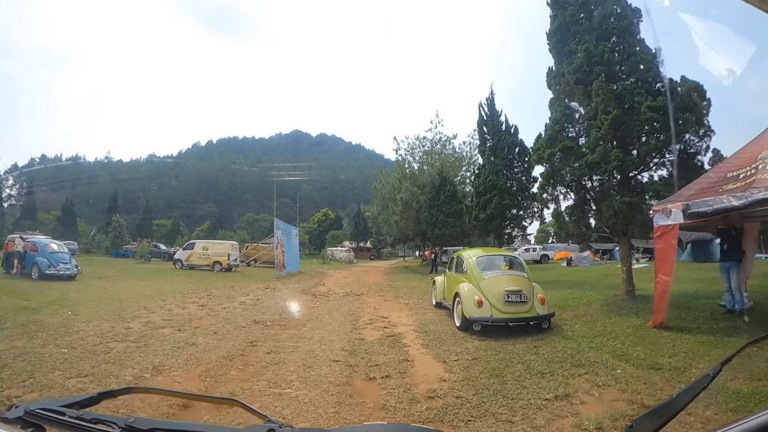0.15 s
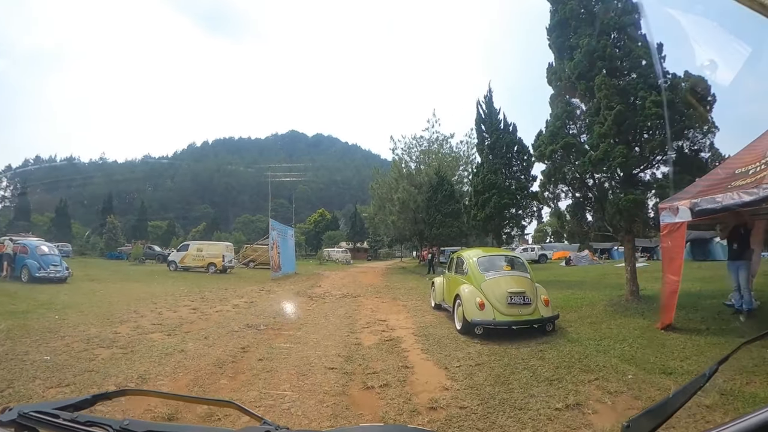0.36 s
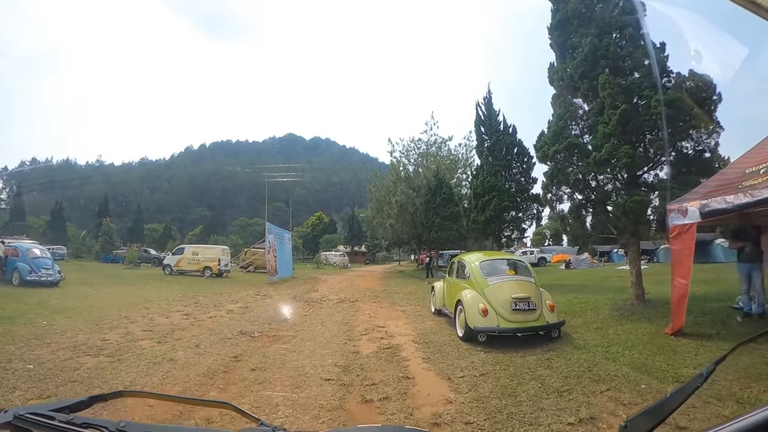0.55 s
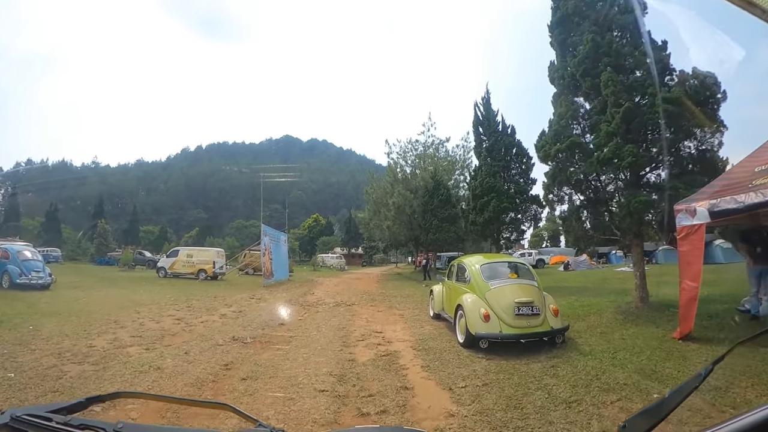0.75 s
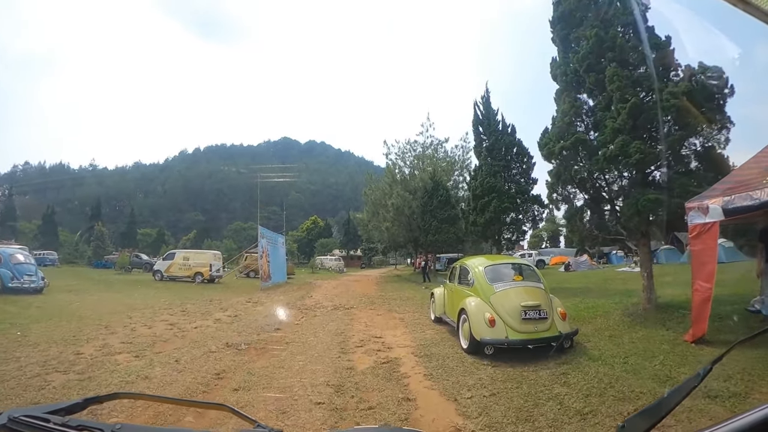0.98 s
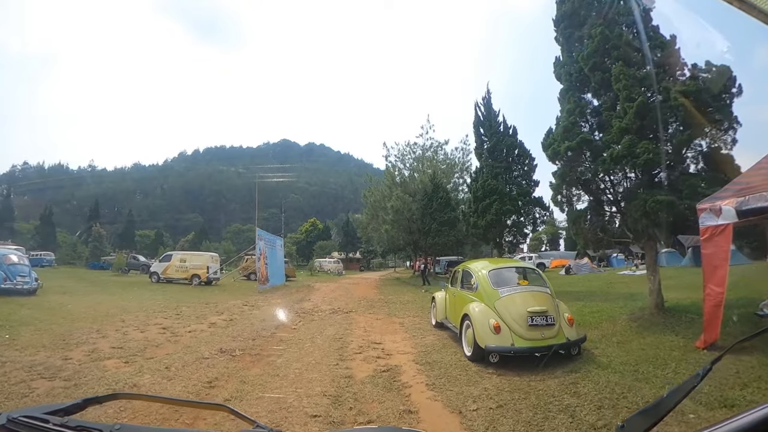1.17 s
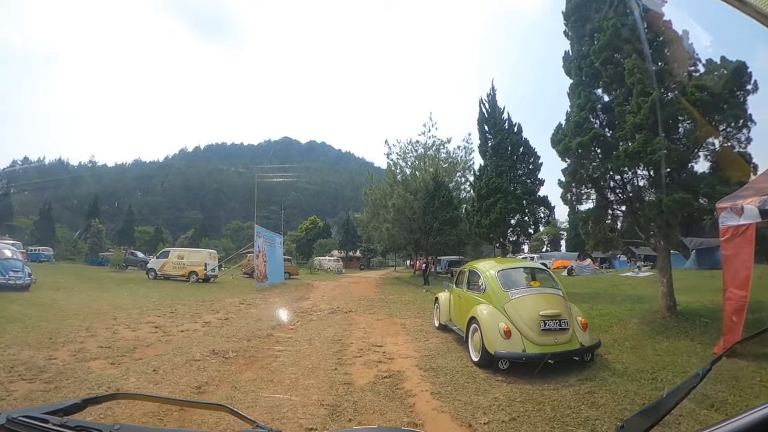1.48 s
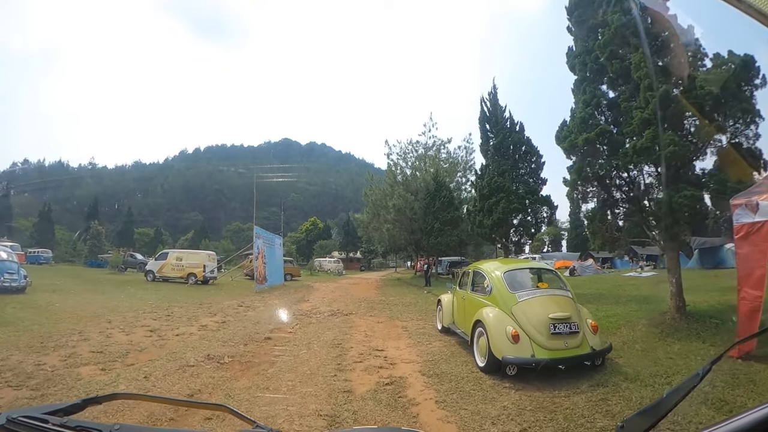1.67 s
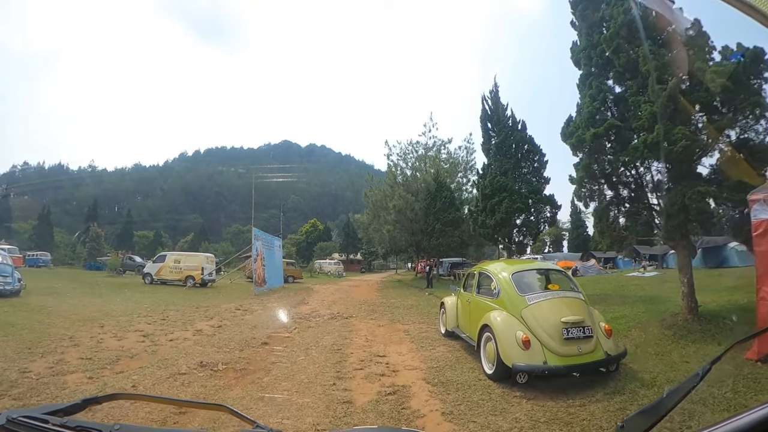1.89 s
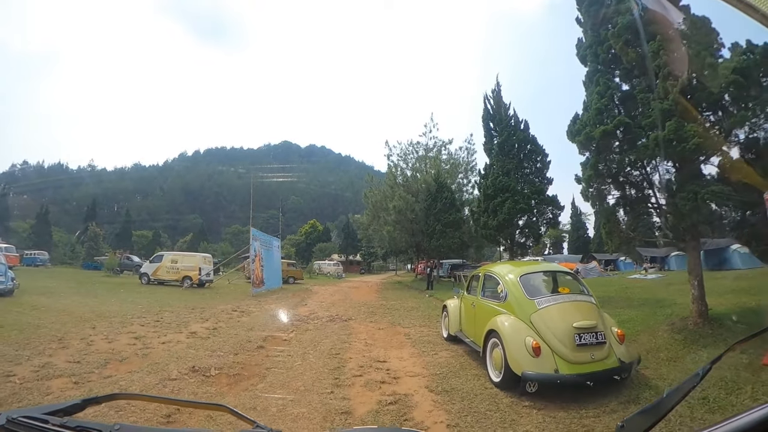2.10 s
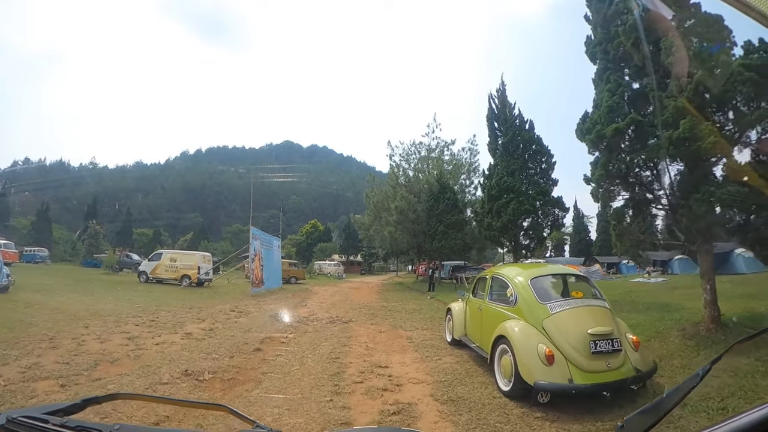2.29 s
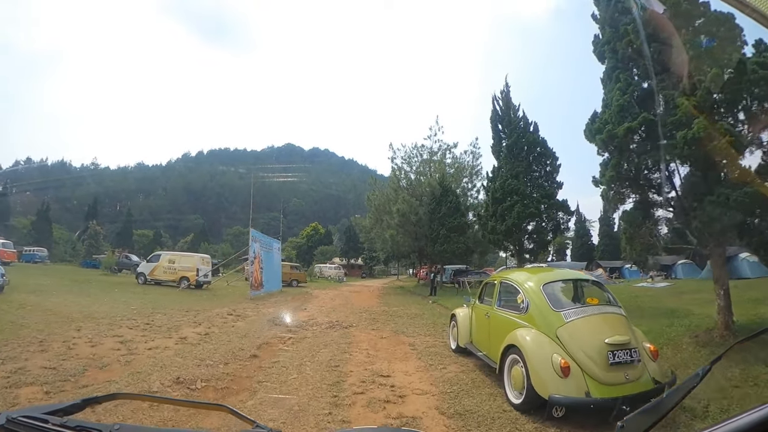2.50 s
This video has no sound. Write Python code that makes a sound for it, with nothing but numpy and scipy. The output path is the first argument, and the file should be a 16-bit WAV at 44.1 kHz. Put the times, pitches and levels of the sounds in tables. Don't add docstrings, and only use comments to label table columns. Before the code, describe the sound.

An old air-cooled engine booms low inside a van cab crawling over rough dirt; keys jingle early, loose trim knocks sharply in the first second, then only small ticks, faint panel rings and grit under tyres.

```python
import sys
import numpy as np
from scipy import signal
from scipy.fft import rfft, irfft, next_fast_len
from scipy.io import wavfile
from scipy.ndimage import uniform_filter1d, minimum_filter1d, map_coordinates

SR = 44100
rng = np.random.default_rng(int(sys.argv[2]) if len(sys.argv) > 2 else 0)


def undo_db(level):
    steps = np.asarray(level, float) / 20
    return 10 ** steps


def store_pcm(level_fs):
    pcm = np.round(np.clip(level_fs, -1, 1) * 32767).astype(np.int16)
    wavfile.write(sys.argv[1], SR, np.atleast_2d(pcm).T)


N = 116865
T = np.arange(N) / SR

# frequency in Hz, t60 in seconds.
CAB_DECAY = [(500, 0.058), (3000, 0.096), (10000, 0.15)]
# time in seconds, level in dB.
SQUEAL_LEVEL = [
    (.14, -82),
    (.195, -72),
    (.21, -53),
    (.27, -56.5),
    (.3, -68),
    (.35, -58),
    (0.367, -84),
]
# frequency in Hz, level in dB.
SQUEAL_LINES = [(11915, 1), (12104, -7.5)]
# start in seconds, level in dB, share of the second key from 0 to 1.
JINGLES = [
    (.008, -56.5, 0.87),
    (0.356, -41, 0.016),
    (0.374, -42.5, 0.66),
    (0.403, -57.5, 0.38),
    (0.578, -52.5, 0.55),
]
# frequency in Hz, first key's level in dB, second key's level in dB,
# t60 in seconds.
KEY_MODES = [(6150, 6, -24, .09), (8420, -10.5, 11, .11), (9450, -8, -14, .2), (9570, 4, -13.5, .11),
             (10660, -4, -3.5, .08), (11520, -7, -6.5, .1), (12450, -15, -12, .12), (13380, -15, -8, .07),
             (14520, -15, -21, .2), (15050, -22, -25, .1)]
# start in seconds, level in dB, pitch in Hz, brightness in dB,
# crack level in dB.
KNOCKS = [(0.4386, -34, 1810, -20, 0), (0.3999, -26, 2960, -8, -3), (0.4635, -27, 1900, -22, -4),
          (.4743, -22, 1600, -20, -14), (0.485, -28.5, 4500, 11, 0), (0.5575, -15.5, 3000, 0, -5.5),
          (0.6962, -31.5, 1900, 0, -8), (0.7289, -31, 1820, 3, -2), (0.779, -23, 2410, -28.5, -9),
          (0.8068, -19.5, 2150, 1.5, -5.5), (0.822, -25, 2800, -22, -9), (0.8749, -21, 3400, 8.5, -8)]
# frequency in Hz, level in dB, t60 in seconds.
TRIM_MODES = [(1070, -3, 0.047), (1403, -1, .05), (1838, 7.5, 0.027), (2260, -12, 0.08), (2560, -5, 0.061),
              (2680, 2, 0.034), (2940, 5, 0.031), (3225, 1.5, 0.038), (3220, -6.5, 0.065),
              (3740, -0.5, 0.042), (4100, -13, 0.034), (4940, -10.5, 0.038), (5780, -25, 0.016),
              (7360, -18, .03)]
# start in seconds, level in dB.
TICKS = [(0.2744, -51), (1.4725, -44), (1.5393, -47.5), (1.6377, -48.5), (1.7044, -44), (1.8504, -50),
         (1.8641, -47), (1.921, -48), (2.0772, -51), (2.1184, -51), (2.1976, -48), (2.2824, -51)]
# centre in Hz, width in Hz, level in dB.
TICK_PEAKS = [(5880, 700, 1), (7150, 1500, -2.5), (3000, 1800, 0)]
# start in seconds, frequency in Hz, level in dB, t60 in seconds.
PANEL_NOTES = [(.02, 558, -39, .15), (.475, 895, -38.5, 0.2), (0.467, 1423, -36.5, 0.14),
               (.358, 1056, -39, 0.2), (.37, 1346, -47, 0.17), (.44, 554, -46.5, 0.18),
               (.559, 1150, -38.5, 0.043), (.465, 1826, -35, 0.097), (0.649, 1400, -40.5, 0.06),
               (0.661, 1110, -45, 0.068), (0.711, 1137, -42, 0.076), (.708, 1380, -48.5, .07),
               (.75, 1030, -47, 0.099), (.775, 563.7, -40.5, 0.14), (0.821, 1078, -38.5, 0.18),
               (.968, 1296, -47, .3), (0.984, 1078, -45.5, 0.2), (1.14, 1339, -44, 0.11),
               (1.145, 570, -43.5, 0.11), (1.15, 2210, -50, 0.17), (1.149, 2700, -48, 0.15),
               (1.19, 834, -45, 0.099), (1.205, 1110, -43, 0.091), (1.2, 3330, -53, .15),
               (1.24, 792, -43.5, 0.19), (1.26, 2096, -53, 0.058), (1.666, 1040, -35.5, .035),
               (1.703, 901.3, -40, 0.03), (1.704, 1710, -50.5, 0.035), (1.715, 2430, -58, .06),
               (1.851, 1772, -42.5, 0.063), (1.906, 1370, -38, 0.057), (1.906, 3000, -49.5, 0.025),
               (0.473, 218, -24, 0.066), (.885, 282, -35.5, 0.3), (1.84, 220, -38, 0.29),
               (2.2, 544, -39.5, 0.098), (2.26, 1020, -43, 0.25), (2.58, 2237, -49, 0.14)]
# start in seconds, length in seconds, level in dB, lean (small = sudden start).
CRUNCHES = [(0.028, 0.25, -47.5, 0.45), (0.351, 0.038, -42, .6), (0.465, 0.083, -39.5, 0.52),
            (0.646, 0.027, -60, 0.52), (1.083, 0.15, -48.5, 1), (1.162, 0.21, -58.5, 0.73),
            (1.699, 0.087, -46.5, 0.27), (1.847, 0.073, -45.5, 0.4), (1.918, 0.077, -51.5, 0.38),
            (2.068, 0.055, -52, 0.65), (2.537, 0.18, -51, 0.59)]
# frequency in Hz, density in dB per Hz.
GRIT_COLOUR = [(300, -32), (600, 0), (1100, 4), (1800, -6.5), (2800, -8), (4200, -14), (8200, -16),
               (13000, -43)]
# frequency in Hz, density in dB per Hz.
ROAD_COLOUR = [(4.7, -32.5), (8.0, -9), (37, -1), (61, -8), (83, -17.5), (108, -15.5), (218, -28.5),
               (351, -41.5), (400, -42), (520, -70.5), (880, -120)]
# start in seconds, length in seconds, peak in dB, pitch in Hz,
# glide in Hz per second.
BOOMS = [(.03, 0.23, -15, 52, 4.5), (.18, 0.31, -20.5, 48.7, -14), (.4, 0.19, -17, 48.9, 13.5),
         (.57, .12, -20.5, 54.9, 7.5), (.68, 0.316, -16.5, 54.07, 55.5), (.96, 0.38, -15.5, 53.08, 23),
         (1.31, 0.24, -14, 52.93, 6), (1.58, 0.4, -18, 52, 30), (1.93, 0.2, -17.5, 51.12, 24),
         (2.15, 0.44, -15, 52, 11.5), (2.48, 0.21, -19, 49.55, -14)]
# start in seconds, length in seconds, peak in dB, pitch in Hz.
HEAVES = [
    (-.03, 0.21, -23, 25.56),
    (0.259, 0.35, -21, 22.53),
    (0.841, 0.27, -24, 25.83),
    (1.002, 0.38, -18, 25.63),
    (1.44, 0.21, -18.5, 21.56),
    (1.639, 0.34, -22, 25.26),
    (1.98, 0.27, -17, 23.87),
    (2.249, 0.34, -22.5, 22.66),
    (2.548, 0.15, -21.5, 24.82),
]
# start in seconds, length in seconds, peak in dB, pitch in Hz.
PANEL_DRUMS = [
    (0, 0.17, -23.5, 73),
    (0.469, 0.26, -25.5, 69.85),
    (0.659, 0.32, -20.5, 72.09),
    (1.14, 0.2, -23.5, 74.05),
    (1.399, 0.11, -19.5, 70.49),
    (1.599, .12, -25, 70.57),
    (1.738, 0.347, -18.5, 66.13),
    (2.019, 0.18, -21.5, 73.12),
    (2.42, 0.16, -22.5, 67.1),
    (2.539, 0.12, -24, 70.88),
]
# start in seconds, length in seconds, peak in dB, pitch in Hz.
FLOOR_THUDS = [(0, 0.11, -33.5, 127.9), (0.461, 0.12, -34, 147.3), (.62, 0.13, -36.5, 149.7),
               (.75, 0.051, -37.5, 139.1), (0.84, 0.054, -40, 142.2), (1.001, .07, -44.5, 159.8),
               (1.169, .18, -43, 161), (1.501, 0.12, -39.5, 146.8), (1.63, .07, -34.5, 152.5),
               (1.81, 0.071, -40, 142.9), (2.01, 0.049, -38, 125), (2.1, 0.081, -35, 131.7),
               (2.18, 0.2, -37.5, 136.1), (2.549, 0.034, -43.5, 136.3)]
# multiple of the firing rate, level in dB.
SHAFT_ORDERS = [(1.5, -12.5), (2, -24)]
# frequency in Hz, density in dB per Hz.
RUSH_COLOUR = [(120, -49.5), (200, 5.5), (422, -7), (1100, -13), (1900, -21), (3300, -26.5), (4200, -29.5),
               (8300, -34), (9200, -45.5), (13000, -91.5)]
# time in seconds, rush level in dB.
RUSH_LEVEL = [(0, -48), (.2, -50.5), (.3, -54.5), (.6, -54), (.7, -49.5), (1.0, -52), (1.25, -49.5), (1.32, -55),
              (1.4, -52), (1.8, -51.5), (2.3, -51), (2.5, -53.5), (2.65, -53)]

FIRING_HZ, FIRING_DB, FIRING_WANDER = 52, -22.5, 0.019
KNOCK_RISE_S, KNOCK_SCATTER_DB, KNOCK_TILT_DB = 0.0012, 2, 14
KEY_RISE_S, KEY_SPLIT, KEY_SCATTER_DB = 0.006, 0.01, 1.5
IDLE_DB = -16.5
SURGE_RISE_HZ_PER_S, SURGE_LEAN = 7.14, 0.77
CAB_DB = -8
MIC_TOP_HZ, LIMIT_PEAK = 14200, 0.37
EDGE_S, EDGE_GAIN = 0.006, 0.6


def unit(x):
    return x / np.sqrt(np.mean(x ** 2) + 1e-20)


def along(points, hz):
    f, v = np.transpose(points)
    return np.interp(np.log(hz + 1), np.log(f + 1), v)


def wobble(rate):
    return map_coordinates(rng.standard_normal(200), [T * rate])


def since(start):
    return np.clip(T - start, 0, None)


def hump(start, length, lean):
    return np.sin(np.pi * np.clip((T - start) / length, 0, 1) ** lean)


def filtered(x, response):
    m = next_fast_len(len(x) + 8192)
    return irfft(rfft(x, m) * response(np.fft.rfftfreq(m, 1 / SR)), m)[:len(x)]


def peaks(rows):
    def response(f):
        total = 0
        for k, (centre, width, db) in enumerate(rows):
            damping = 1j * f * width
            total = total + (-1) ** k * undo_db(db) * damping / (centre ** 2 - f ** 2 + damping)
        return total
    return response


def noise(colour, patchy_db):
    z = signal.stft(rng.standard_normal(N + 512), nperseg=512)[2]
    field = uniform_filter1d(rng.standard_normal(z.shape), 6, axis=0)
    field = uniform_filter1d(field, 10, axis=1)
    x = signal.istft(z * undo_db(patchy_db * unit(field)), nperseg=512)[1][:N]
    return unit(filtered(x, lambda hz: undo_db(along(colour, hz))))


def ring(start, hz, db, t60, rise_s, turn=0):
    t = since(start)
    return undo_db(db - 60 * t / t60) * (1 - np.exp(-t / rise_s)) * np.sin(2 * np.pi * (hz * t + turn))


def cab(x):
    out, size = np.zeros(N + SR), SR // 10
    for start in range(0, N, size):
        hz, t, z = signal.stft(rng.standard_normal(SR // 5), SR, nperseg=128)
        decay = undo_db(-60 * t / along(CAB_DECAY, hz)[:, None])
        tail = signal.istft(z * decay, SR, nperseg=128)[1]
        wet = signal.fftconvolve(x[start:start + size], tail / np.linalg.norm(tail))
        out[start + 90:][:len(wet)] += wet
    return out[:N]


def squeal():
    s, db = np.transpose(SQUEAL_LEVEL)
    level = undo_db(np.interp(T, s, db, -200, -200))
    lines = np.zeros(N)
    for hz, line_db in SQUEAL_LINES:
        flutter = undo_db(line_db + 3.5 * wobble(45.6))
        lines += flutter * np.sin(2 * np.pi * np.cumsum(hz + 25 * wobble(50)) / SR)
    return level * lines


def keys():
    out, chatter = np.zeros(N), np.zeros(N)
    luck_db = rng.normal(0, KEY_SCATTER_DB, (len(JINGLES), len(KEY_MODES)))
    for (s, db, share), row in zip(JINGLES, luck_db):
        for (hz, first_db, second_db, t60), luck in zip(KEY_MODES, row):
            mode_db = db + first_db + np.clip(share, 0, 1) * (second_db - first_db) + luck
            for side in (-0.5, 0.5):
                out += ring(s, hz * (1 + side * KEY_SPLIT), mode_db - 5 - 4 * side, t60, KEY_RISE_S)
        chatter += np.clip((T - s) / 0.033, 0, 1) * undo_db(db + 3.5 - 60 * since(s) / 0.15)
    metal = peaks([(1200, 2500, 1), (7000, 5000, 0)])
    return out + filtered(chatter * rng.standard_normal(N), lambda f: metal(f) / (1 + 1j * f / 16000))


def trim_knocks():
    out = np.zeros(N)
    luck_db = rng.normal(0, KNOCK_SCATTER_DB, (len(KNOCKS), len(TRIM_MODES)))
    for (s, db, pitch, bright_db, crack_db), row in zip(KNOCKS, luck_db):
        for (hz, mode_db, t60), luck in zip(TRIM_MODES, row):
            tilt_db = KNOCK_TILT_DB * abs(np.log2(hz / pitch))
            out += ring(s, hz, db - 15 + mode_db + luck - tilt_db, t60, KNOCK_RISE_S, turn=luck)
        decay = undo_db(db + crack_db - 60 * since(s) / 0.059)
        crack = np.clip((T - s) / KNOCK_RISE_S, 0, 1) * decay * rng.standard_normal(N)
        shell = peaks([(pitch, 0.9 * pitch, 0), (7500, 4000, bright_db / 2 - 6)])
        out += filtered(crack, lambda f: shell(f) ** 2 / (1 + 1j * f / 11000) ** 2)
    return out


def trim_ticks():
    bursts = sum((T > s) * undo_db(db + 5 - 60 * since(s) / 0.013) for s, db in TICKS)
    return filtered(bursts * rng.standard_normal(N), lambda f: peaks(TICK_PEAKS)(f) ** 2)


def panel_notes():
    return sum(ring(s, hz, db, t60, 0.033 * t60) for s, hz, db, t60 in PANEL_NOTES)


def tyres():
    swell = sum(undo_db(db) * hump(s, length, lean) ** 2 for s, length, db, lean in CRUNCHES)
    grains = undo_db(2.4 * unit(uniform_filter1d(rng.standard_normal(N), SR // 400)))
    return swell * unit(grains * noise(GRIT_COLOUR, 1.5))


def mode(surges):
    mean_db, mean_hz = np.mean(surges, axis=0)[2:4]
    size = np.full(N, undo_db(mean_db + IDLE_DB))
    pull = size * mean_hz
    for s, length, db, hz, *glide in surges:
        swell = undo_db(db) * hump(s, length, SURGE_LEAN) ** 1.254
        rise = glide[0] if glide else SURGE_RISE_HZ_PER_S * hz / FIRING_HZ
        size = size + swell
        pull = pull + swell * (hz + rise * (T - s - length / 2))
    turns = np.cumsum(pull / size) / SR + rng.random()
    return size * np.sqrt(2) * np.sin(2 * np.pi * turns)


def body():
    rumble = undo_db(-25.5 + 0.62 * wobble(5)) * noise(ROAD_COLOUR, 3)
    return rumble + mode(BOOMS) + mode(HEAVES) + mode(PANEL_DRUMS) + mode(FLOOR_THUDS)


def engine():
    turns = np.cumsum(FIRING_HZ * (1 + FIRING_WANDER * wobble(5.5))) / SR
    shaft = np.zeros(N)
    for multiple, db in SHAFT_ORDERS:
        level = undo_db(FIRING_DB + db + 2.5 * wobble(7.3))
        shaft += level * np.sqrt(2) * np.sin(2 * np.pi * (multiple * turns + rng.random()))
    puffs = 1 + 0.08 * np.cos(2 * np.pi * turns)
    rush_db = np.interp(T, *np.transpose(RUSH_LEVEL))
    rush = undo_db(rush_db + 8 + 0.8 * wobble(15)) * puffs * noise(RUSH_COLOUR, 1.6)
    return shaft + rush


def scene():
    hits = keys() + trim_knocks() + trim_ticks() + panel_notes()
    mix = undo_db(CAB_DB) * cab(hits) + squeal() + hits + tyres() + body() + engine()
    return mix[None]


def band_limit(x):
    return signal.sosfilt(signal.butter(12, 15670, fs=SR, output="sos"), x)


def record(dry):
    dull = signal.butter(N=6, Wn=MIC_TOP_HZ, fs=SR, output="sos")
    heard = signal.sosfiltfilt(dull, dry)
    heard = heard * np.clip(EDGE_GAIN + np.minimum(T, T[-1] - T) / EDGE_S, 0, 1)
    need = np.minimum(1, LIMIT_PEAK / (np.abs(heard) + 1e-9))
    need = minimum_filter1d(need, SR // 50, axis=1)
    return band_limit(heard * uniform_filter1d(need, SR // 50, axis=1))


dry = scene()
out = record(dry)
store_pcm(out)
```